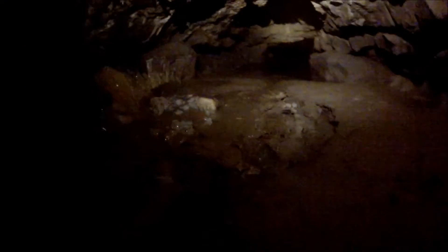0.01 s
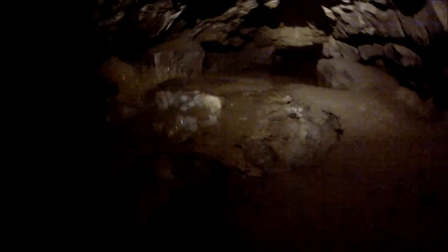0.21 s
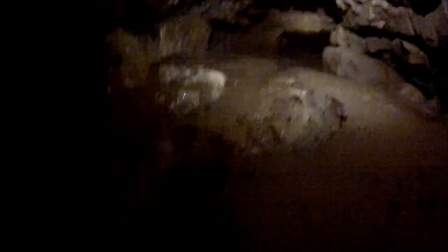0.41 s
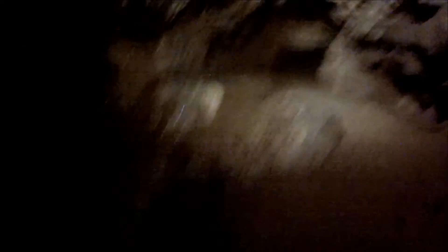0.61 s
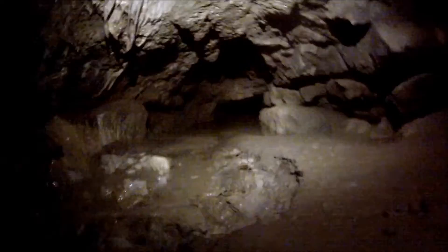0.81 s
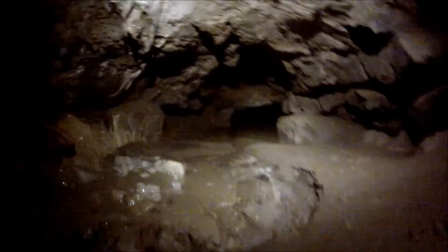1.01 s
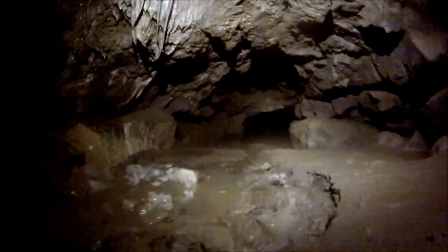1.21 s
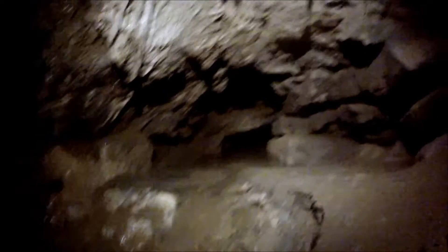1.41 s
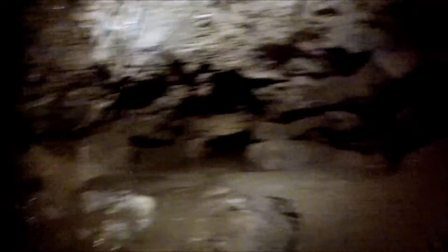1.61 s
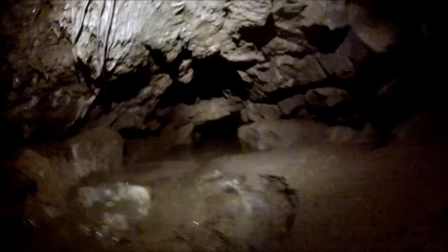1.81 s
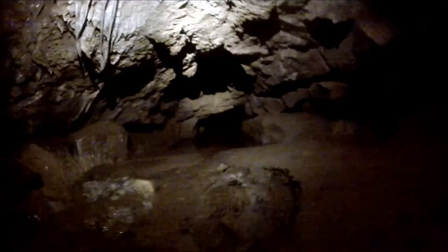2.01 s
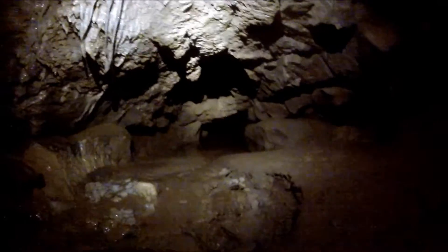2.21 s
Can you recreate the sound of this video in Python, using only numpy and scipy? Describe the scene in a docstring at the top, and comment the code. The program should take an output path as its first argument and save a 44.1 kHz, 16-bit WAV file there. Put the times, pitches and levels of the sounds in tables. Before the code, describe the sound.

Close, rough handling noise in a cave: short gritty scrapes, sharp ticks and dull low bumps

```python
"""In a wet cave, someone clambers about with a hand-held camera. Wet clothing scrapes in short strokes right by
the microphone: stick-slip friction, a swarm of tiny slips that rings the resonances of the camera's case.
Hard bits tick against the case as impulses, each with a little grit. Soft bumps thud as decaying low
oscillations that sag in pitch. Faint running water, as filtered noise, and low air lie behind."""
import sys
import numpy as np
from scipy import signal
from scipy.fft import rfft, irfft
from scipy.io import wavfile
from scipy.ndimage import map_coordinates

SR = 44100
rng = np.random.default_rng(int(sys.argv[2]) if len(sys.argv) > 2 else 0)


def dump(signal):
    """Clip the signal to [-1, 1] and save it as 16-bit WAV at the path in sys.argv[1]."""
    limited = np.clip(np.atleast_2d(signal).T, -1, 1)
    pcm = np.round(limited * 32767).astype(np.int16)
    wavfile.write(sys.argv[1], SR, pcm)


N = 101430
FFT_SIZE = 131072
HZ = np.fft.rfftfreq(FFT_SIZE, 1 / SR)
T = np.arange(N) / SR

# Scrapes
RISE_DB, FALL_DB = 8.5, 7  # how far a stroke's start and end lie below its strongest moment
EDGE_S = 0.0036  # time constant of letting go; gripping takes half of it
SLIPS_PER_S, SLIP_SPREAD_DB = 3000, 2.5  # rate of the tiny slips and scatter of their size
HISS_DB = -8.5  # smooth rubbing, relative to the slips
CRACKLE_PER_S, CRACKLE_DB = 70, -11  # sparse larger snags, level relative to the slips
JUDDER_PER_S, JUDDER_DB = 390, 0.5  # uneven grip: random knots a second and their scatter
# Contacts and case
CONTACT_WIDTH_HZ = 220  # bandwidth of every contact's own resonance
TREBLE_HZ = 2600  # crossover between the case's body and treble
CASE_LOW_HZ = 890  # the case passes little below this
CHATTER_DB, CHATTER_T60_S = 0, 0.016  # grit in a tick: energy relative to the impulse, and decay
# Bumps
BUMP_T60_S, BUMP_ATTACK_S = 0.071, 0.0011  # 60 dB decay time; time constant of the onset
BUMP_SAG, BUMP_SAG_S = 0.69, 0.005  # a bump starts this share higher, then settles
PUFF_DB, PUFF_T60_S = -18.5, 0.072  # dull noise in each bump
# Background and microphone
STREAM_DB, STREAM_SWAY_DB, AIR_DB = -58.5, 7, -54  # water level, scatter of its sway, air level
CAVE_DB, CAVE_T60_S = -18, 0.13
NULL_HZ, NULL_WIDTH_HZ, NULL_DB = 12025, 926, -38  # the microphone's dead band
DIP_HZ, DIP_WIDTH_HZ, DIP_DB = 5980, 89, -8.5  # a narrow cancellation in the microphone port
TOP_HZ = 15600  # upper band limit

# Noise spectrum of the shaken camera. Each row: frequency in Hz, relative level in dB.
RUMBLE_SPECTRUM = [(20, -8), (45, -2.5), (85, -1), (160, -5), (270, -10), (450, -18.5), (800, -23.5),
                   (2000, -35)]


def scrapes(body, treble):
    """Stick-slip friction: dense uneven slips excite the case, and each stroke shakes it with a low rumble."""
    # Strokes of wet clothing. Each row: start, strongest moment and end in seconds, level in dB, treble and
    # rumble in dB relative to it, contact resonance in Hz, boost at that resonance in dB.
    strokes = [ (0.018, 0.064, 0.13, -40.5, -3.5, -14.5, 2300, 9),
               (0, 0.127, 0.15, -48.5, -1.5, -1, 1800, 6), (0.147, 0.17, 0.2, -46.5, -1, -4, 2300, -2),
               (0.226, 0.258, 0.28, -28, -1, -5.5, 1190, 7),
               (0.281, 0.329, 0.38, -41.5, -2.5, -16, 2140, 2.5),
               (0.351, .372, 0.43, -33.5, -4.5, -12.5, 2200, 1),
               (0.424, 0.472, 0.52, -34.5, 1.5, -8, 3480, 2),
               (0.507, 0.645, 0.66, -27.5, 3, -6.5, 1570, 6.5),
               (0.649, 0.685, 0.7, -25.5, -0.5, -10, 1750, 5.5),
               (0.692, 0.718, 0.83, -36.5, -2.5, -13.5, 2140, 3.5),
               (0.763, 0.783, 0.81, -33.5, -3.5, 6, 1030, 12.5), (.795, .81, .86, -39.5, 0, -2.5, 2150, 12),
               (0.841, 0.879, 0.9, -31, 3.5, -17, 3570, 2.5),
               (0.89, 0.912, 0.94, -26.5, 0.5, -16, 1790, 6.5),
               (0.922, 0.947, .985, -41, -1, -4.5, 2230, 6.5), (0.99, 0.995, 1.015, -56, 3, -2, 2200, 8),
               (1.095, 1.093, 1.13, -34.5, 3, -7.5, 3530, 4), (1.114, 1.129, 1.138, -22, 2, -16, 2100, 5),
               (1.137, 1.136, 1.142, -19.5, 1, -28, 2120, 8),
               (1.147, 1.148, 1.193, -41, 1.5, -13.5, 2200, 6),
               (1.197, 1.226, 1.234, -28, 4.5, -14, 2040, 8),
               (1.255, 1.272, 1.264, -22, 5.5, -13.5, 3480, 10.5),
               (1.272, 1.274, 1.38, -48.5, -25, 0, 2200, -3),
               (1.331, 1.347, 1.39, -42.5, 0.5, -6.5, 2570, 9),
               (1.388, 1.384, 1.417, -37, 4.5, -12, 2610, 15.5),
               (1.378, 1.4, 1.453, -40.5, 5.5, -14, 1434, 18),
               (1.44, 1.463, 1.482, -25.5, -1, -14.5, 2510, 11.5),
               (1.479, 1.504, 1.506, -28.5, 1.5, -13.5, 3230, 9),
               (1.508, 1.509, 1.574, -37, -0.5, -10.5, 2200, 7.5),
               (1.531, 1.538, 1.584, -33, -0.5, -21, 1750, 13),
               (1.559, 1.573, 1.63, -32, 1.5, -15, 1680, 9), (1.601, 1.613, 1.635, -28, 1.5, -13, 1650, 6),
               (1.625, 1.644, 1.698, -25, -1.5, -11.5, 2180, 8.5),
               (1.701, 1.711, 1.73, -36, -0.5, -8.5, 1920, 6.5),
               (1.729, 1.765, 1.95, -49.5, 1, -12, 2204, 3),
               (1.769, 1.833, 1.872, -35, -0.5, -10.5, 2480, 9.5),
               (1.857, 1.856, 2.05, -50, -8, -6.5, 2484, -1),
               (1.935, 1.944, 2.023, -37, -1.5, -14, 2440, 1.5),
               (1.958, 2.005, 2.03, -36, -5, -12, 1800, 0),
               (2.073, 2.097, 2.213, -38.5, -6, -11.5, 1910, 5.5),
               (2.215, 2.183, 2.335, -52.5, -0.5, -15, 1820, 7)]
    drive = np.zeros((2, N))  # force on the body band and on the treble band
    shake_power = np.zeros(N)
    judder = unit(amp(JUDDER_DB * wobble(JUDDER_PER_S)))
    for start, top, end, db, treble_db, rumble_db, hz, boost_db in strokes:
        near = slice(max(round(start * SR) - SR // 40, 0), round(end * SR) + SR // 40)
        pressure = amp(db) * stroke(T[near], start, top, end)
        chance = rng.random(N)[near]
        size = rng.standard_normal(N)[near]
        hiss = rng.standard_normal(N)[near]

        slip_size = amp(SLIP_SPREAD_DB * np.clip(size, -2, 2))
        slips = (chance < SLIPS_PER_S / SR) * np.sign(hiss) * slip_size
        # The root scales the sparse snags to about rms 1.
        snags = (chance > 1 - CRACKLE_PER_S / SR) * np.sqrt(SR / CRACKLE_PER_S)
        rubbing = unit(slips) + amp(HISS_DB) * hiss + amp(CRACKLE_DB) * snags
        friction = unit(rubbing) * judder[near]

        drive[:, near] += amp([[0], [treble_db]]) * contact(friction * pressure, hz, boost_db)
        shake_power[near] += (amp(rumble_db) * pressure) ** 2
    ringing = filtered(drive[0], body) + filtered(drive[1], treble)
    rub = ringing / np.linalg.norm(irfft(body + treble))  # case scaled to unit energy
    return rub + np.sqrt(shake_power) * noise(RUMBLE_SPECTRUM)


def stroke(t, start, top, end):
    """Friction follows pressure, which grips, swells to its top, fades and lets go exponentially."""
    swell_db = np.interp(t, [start, top, end], [-RISE_DB, 0, -FALL_DB])
    outside = np.maximum(start - t, 0) * 2 + np.maximum(t - end, 0)
    return amp(swell_db) * np.exp(-outside / EDGE_S)


def ticks(body, treble):
    """Impulse excitation: one sharp contact and a little decaying grit ring the same case."""
    # Hard contacts. Each row: time in seconds, level in dB, treble relative to body in dB,
    # contact resonance in Hz, boost at that resonance in dB.
    hard_contacts = [(0.2058, -26, 1, 3470, -5), (.2635, -12, -1.5, 2760, 12.5),
                     (0.3599, -13, -0.5, 3430, 7), (.362, -21, 9, 3450, 0), (.376, -18, -5, 2180, 4.5),
                     (.424, -16, 2.5, 1700, 10), (.48, -21.5, 9, 3480, 6), (0.6602, -12, 6, 2220, 12),
                     (.7893, -16, 0, 3460, 5), (.792, -13, -4.5, 1120, 6), (.883, -11.5, -2.5, 3500, 9),
                     (0.8982, -3.5, -2, 1440, -5), (1.056, -29.5, -6, 2240, 4),
                     (1.0938, -17, -7.5, 1100, 4.5), (1.271, -13, 4.5, 2270, 14.5),
                     (1.358, -25, 3, 3350, 4), (1.36, -22.5, 5.5, 3280, 9), (1.4085, -20.5, 3, 3185, 16),
                     (1.432, -15.5, 5.5, 3200, 10), (1.4576, -17.5, -7.5, 1490, 16),
                     (1.6015, -14.5, 1, 2230, 10.5), (1.609, -13, -4, 2930, 12), (1.654, -16, -3, 2050, 12),
                     (1.676, -22, -3, 1900, 3), (1.695, -20, 9, 3340, 5), (1.7696, -14.5, 4, 3600, 10.5),
                     (1.7706, -15.5, 10, 1810, 7), (1.7786, -16.5, 8, 3640, 10),
                     (1.8365, -20.5, 8.5, 3270, 5), (2.076, -34, -6, 1200, 1)]
    t = T[:SR // 20]
    blows = np.zeros((2, N + SR))
    for s, db, treble_db, hz, boost_db in hard_contacts:
        grit = rng.standard_normal(len(t)) * amp(-60 * t / CHATTER_T60_S)
        impulse = t == 0
        blow = contact(impulse + amp(CHATTER_DB) * grit / np.linalg.norm(grit), hz, boost_db)
        band_db = [[db - treble_db / 2], [db + treble_db / 2]]
        blows[:, round(s * SR):][:, :len(t)] += amp(band_db) * blow
    ringing = filtered(blows[0, :N], body) + filtered(blows[1, :N], treble)
    return ringing / np.abs(irfft(body + treble)).max()  # case scaled to unit peak


def contact(x, hz, boost_db):
    """Local resonance: one point of contact boosts or weakens a narrow band of the force x."""
    b, a = signal.iirpeak(hz, hz / CONTACT_WIDTH_HZ, SR)
    return x + (amp(boost_db) - 1) * signal.lfilter(b, a, x)


def case_bands():
    """Modal resonance: the case answers as a sum of resonant peaks, split into its body and its treble."""
    # Resonances of the case and microphone port. Each row: frequency in Hz, width in Hz, level in dB.
    resonances = [(1100, 232, -4), (1650, 680, -2.5), (2230, 440, -1), (2810, 900, -9), (3480, 287, 1),
                  (3850, 340, -9), (4757, 590, -14), (7200, 620, -17.5), (8490, 272, -3.5), (9710, 430, -9),
                  (10240, 370, -16), (14220, 520, -11), (15000, 240, -19)]
    power = sum(amp(db) ** 2 / (1 + ((HZ - hz) / width) ** 2 * 2) ** 2 for hz, width, db in resonances)
    low_cut = np.sqrt(1 + (CASE_LOW_HZ / (HZ + 1)) ** 6)
    response = causal(np.sqrt(power + amp(-21.5) ** 2) / low_cut)  # with a floor between the peaks
    body_share = 1 / (1 + (HZ / TREBLE_HZ) ** 8)
    return response * body_share, response * (1 - body_share)


def bumps():
    """Damped oscillation: soft knocks rock the camera for a few sagging low cycles, with a dull puff."""
    # Soft knocks. Each row: time in seconds, level in dB, settled pitch in Hz.
    knocks = [(.258, -33.5, 117), (0.595, -21, 101), (0.621, -18, 130), (.657, -24.5, 249),
              (.772, -26.5, 190), (.784, -18.5, 161), (.791, -9, 79.3), (1.198, -35.5, 198),
              (1.209, -28.5, 50), (1.265, -36, 100), (1.536, -22, 62), (1.645, -28, 70), (1.663, -29, 129),
              (1.691, -31, 75), (2.072, -27.5, 76)]
    out = np.zeros(N)
    puff = amp(PUFF_DB) * noise(RUMBLE_SPECTRUM)
    for s, db, hz in knocks:
        near = slice(round(s * SR), round(s * SR) + SR // 5)
        t = T[:len(T[near])]
        # The integral of a frequency that relaxes to hz.
        cycles = hz * (t + BUMP_SAG * BUMP_SAG_S * (1 - np.exp(-t / BUMP_SAG_S)))
        tone = amp(-60 * t / BUMP_T60_S) * np.sin(2 * np.pi * cycles)
        thud = tone + amp(-60 * t / PUFF_T60_S) * puff[near]
        out[near] += amp(db) * (1 - np.exp(-t / BUMP_ATTACK_S)) * thud
    return out


def cave(x):
    """Reverberation: the rock answers with a short, weak, exponentially decaying noise response."""
    tail = rng.standard_normal(SR // 2) * amp(-60 * T[:SR // 2] / CAVE_T60_S)
    return amp(CAVE_DB) * signal.fftconvolve(x, tail / np.linalg.norm(tail))[:N]


def stream(case):
    """Filtered noise: faint swaying water through the case and port, and the low air of the cave."""
    # Noise spectrum of the air. Each row: frequency in Hz, relative level in dB.
    air_spectrum = [(20, 5), (45, 8.5), (120, -9.5), (300, -11), (650, -20), (2000, -19), (5000, -27),
                    (15000, -44)]
    sway = amp(STREAM_SWAY_DB * wobble(40.1))  # random knots a second
    water = unit(filtered(rng.standard_normal(N), case) * sway)
    return amp(STREAM_DB) * water + amp(AIR_DB) * noise(air_spectrum)


def amp(db):
    """Logarithmic level: decibels to amplitude gain."""
    return 10 ** (np.asarray(db) / 20)


def unit(x):
    """Effective value: scale to rms 1."""
    return x / np.sqrt(np.mean(x ** 2) + 1e-20)


def filtered(x, response):
    """Linear filtering: multiply the spectrum of x by a frequency response."""
    return irfft(rfft(x, FFT_SIZE) * response, FFT_SIZE)[:N]


def causal(gain):
    """Minimum phase: fold the cepstrum so that a response with this gain never precedes its cause."""
    cepstrum = irfft(np.log(np.maximum(gain, 1e-6)))
    cepstrum[1:FFT_SIZE // 2] *= 2
    cepstrum[FFT_SIZE // 2 + 1:] = 0
    return np.exp(rfft(cepstrum))


def noise(points):
    """Spectral shaping: noise of rms 1 with a spectrum through the (Hz, dB) points."""
    hz, db = np.transpose(points)
    gain = amp(np.interp(np.log(HZ + 1), np.log(hz), db))
    return unit(filtered(rng.standard_normal(N), gain))


def wobble(rate):
    """Random modulation: a smooth curve through random knots, rate of them a second."""
    return map_coordinates(rng.standard_normal(N // 10), [T * rate], mode="wrap")


def scene():
    """Superposition: close handling sounds, the cave's answer to scrapes and ticks, and the background."""
    body, treble = case_bands()
    close = scrapes(body, treble) + ticks(body, treble)
    return (close + cave(close) + bumps() + stream(body + treble))[None]


def record(dry):
    """Band limiting: the microphone has a narrow dip, a dead band in the high treble and a steep top."""
    null_db = NULL_DB * np.exp(-np.abs((HZ - NULL_HZ) / NULL_WIDTH_HZ) ** 4)
    dip_db = DIP_DB * np.exp(-((HZ - DIP_HZ) / DIP_WIDTH_HZ) ** 2)
    port = causal(amp(null_db + dip_db))
    return filtered(dry[0], port / (1 + (HZ / TOP_HZ) ** 120))[None]


dry = scene()
out = record(dry)
dump(out)
```